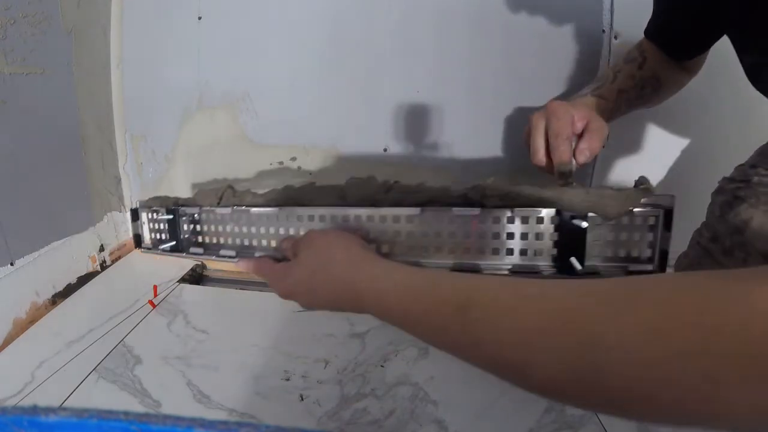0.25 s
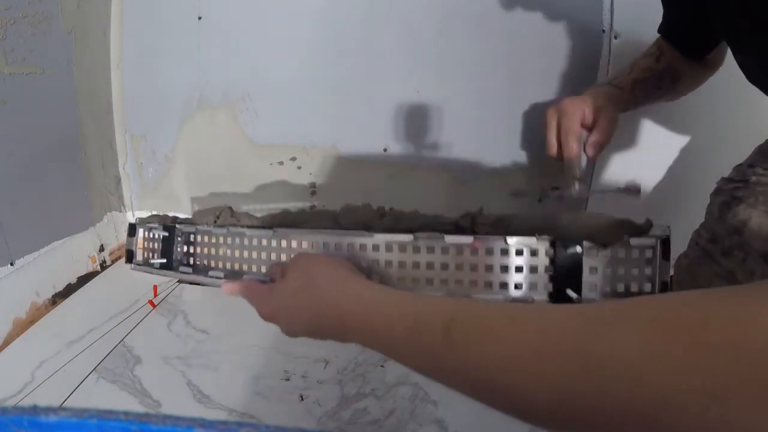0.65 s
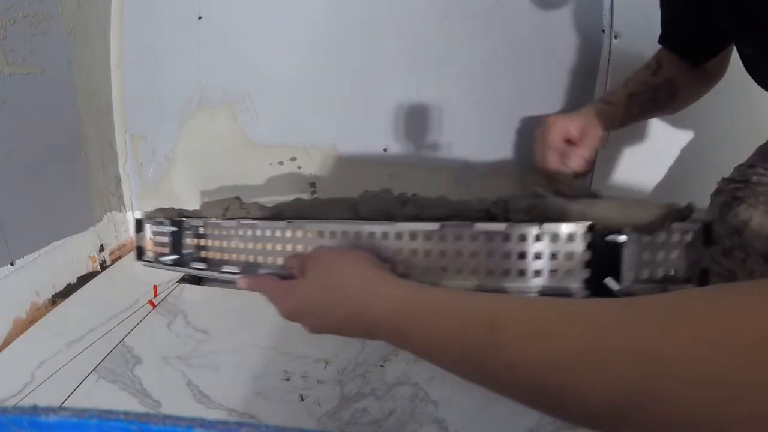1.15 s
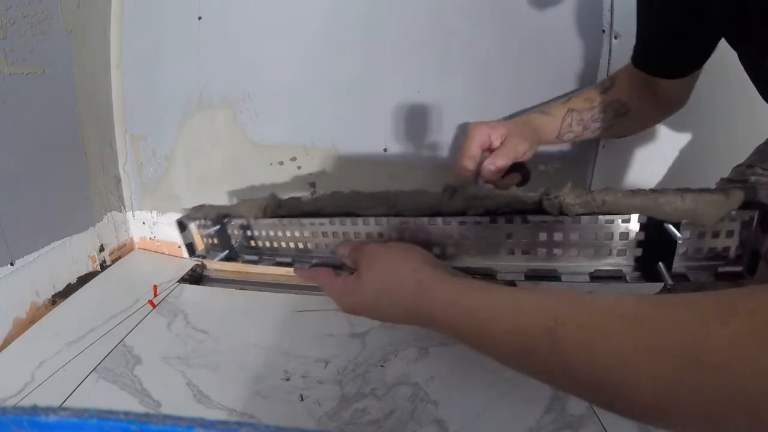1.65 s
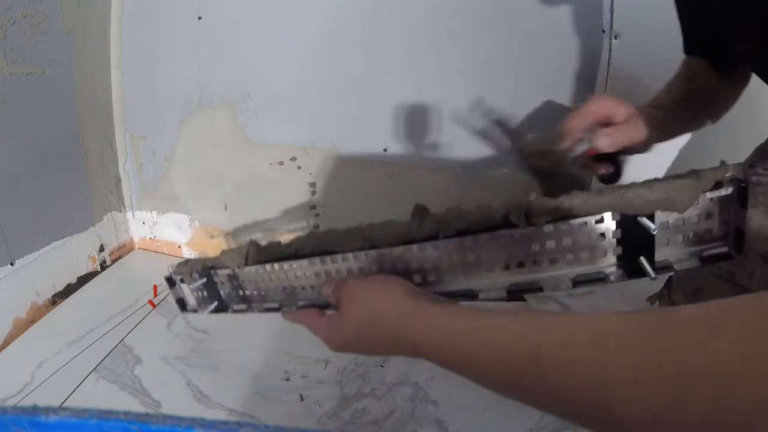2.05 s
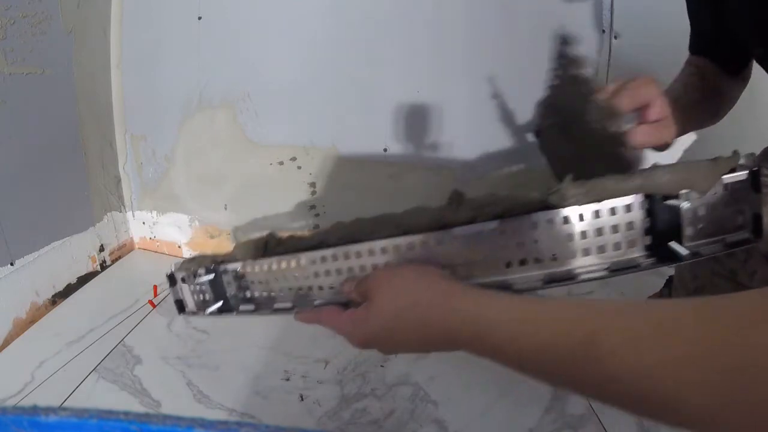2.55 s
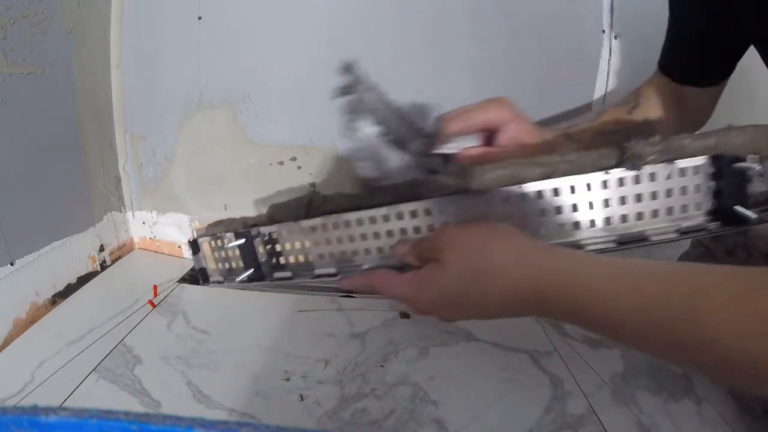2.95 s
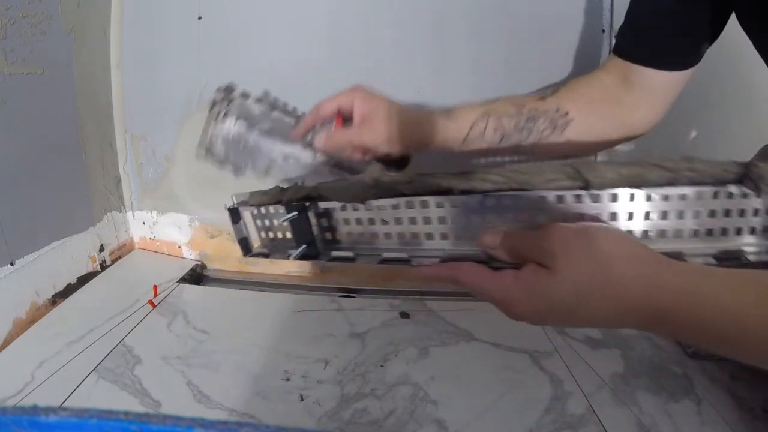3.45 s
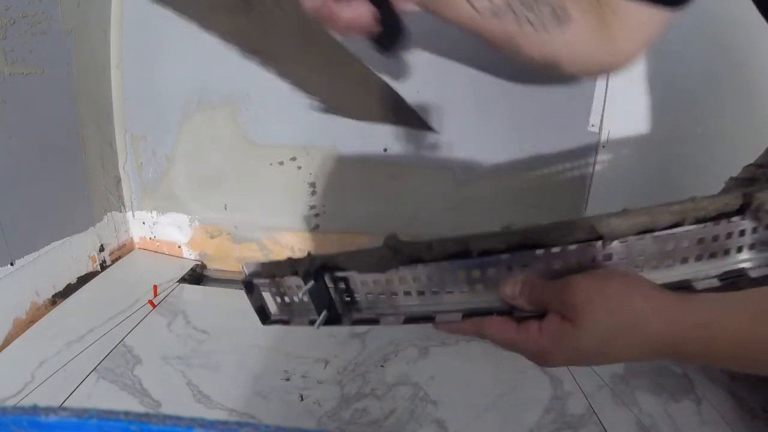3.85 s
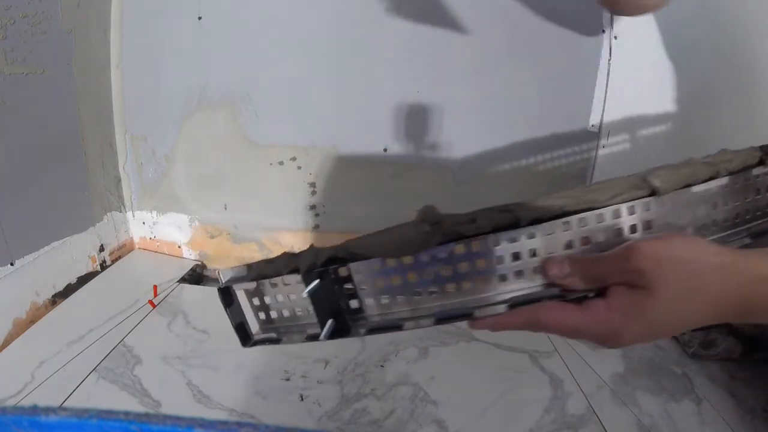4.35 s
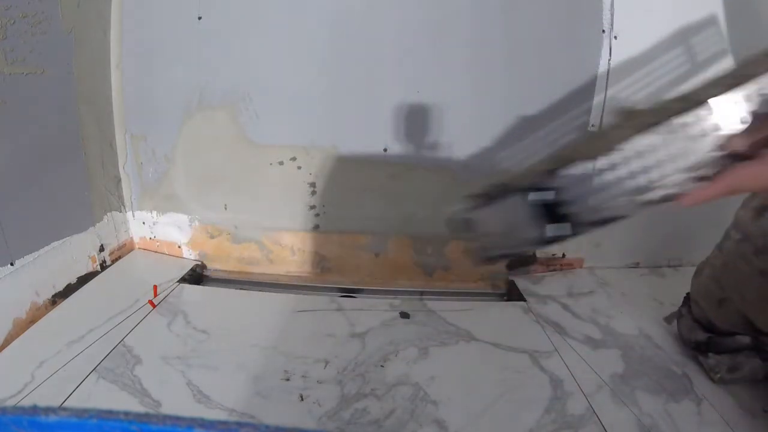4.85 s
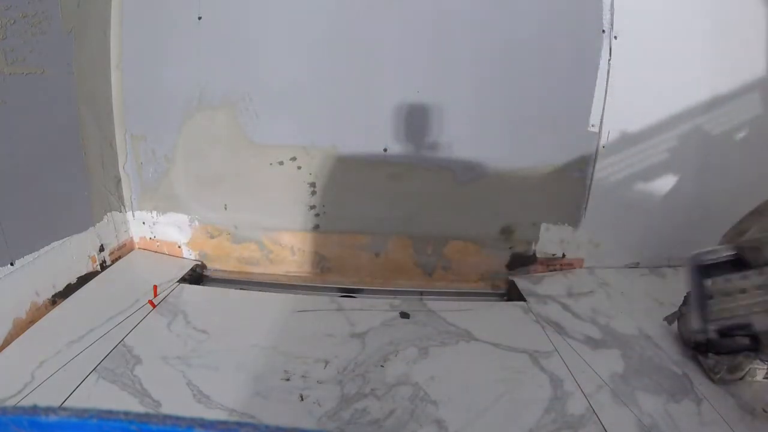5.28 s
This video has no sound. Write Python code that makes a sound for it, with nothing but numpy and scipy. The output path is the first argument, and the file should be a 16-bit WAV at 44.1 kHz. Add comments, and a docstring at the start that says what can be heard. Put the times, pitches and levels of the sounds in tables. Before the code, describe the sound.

A steel trowel makes short gritty wipes and squeaks on a metal channel, then knocks and scrapes at length before light ticks and a floor thud.

```python
"""Bare tiled bathroom: a steel trowel wipes mortar onto a long metal drain channel, knocks, then scrapes at length.
Trowel: random grit clicks and short rattles ring steel modes; gliding tones squeak, mode pairs sing on.
Channel ticks, rustling clothes and a sliding shoe are coloured clicks; landings ring low floor modes.
Decaying noise makes the small room's reverberation; filtered noise and sines make rumble, hiss and hum."""
import sys
import numpy as np
from scipy import signal
from scipy.fft import rfft, irfft, next_fast_len
from scipy.io import wavfile
from scipy.ndimage import uniform_filter1d

SR = 44100
rng = np.random.default_rng(int(sys.argv[2]) if len(sys.argv) > 2 else 0)


def put_to_file(sound):
    """Save the sound as 16-bit audio at rate SR, in the file named by the first command-line argument."""
    columns = np.atleast_2d(sound).T  # one column per channel
    safe = np.clip(columns, -1, 1)
    whole_steps = np.round(safe * 32767)
    wavfile.write(sys.argv[1], SR, whole_steps.astype(np.int16))


N = 243431
TIME_S = np.arange(N) / SR

# Source levels are relative: each source has its own mix gain.
# air noise spectrum: (frequency [Hz], level [dB])
AIR_SPECTRUM = [(12, -47), (22, -3), (45, -11.5), (70, -5.5), (100, -3), (155, -21), (200, -16),
                (260, -21.5), (480, -22.5), (1000, -28), (2500, -32.5), (4900, -44), (6800, -31.5),
                (14000, -46.5)]
# steady hum lines: (frequency [Hz], rms level [dB])
HUM_LINES = [(59.5, -59), (721, -74)]
# room decay: (frequency [Hz], t60 [s])
ROOM_DECAY = [(80, 0.53), (250, 0.67), (1400, 0.54), (4000, 0.57), (7000, 0.67), (13000, 0.38)]
# microphone port resonance: (frequency [Hz], width [Hz], level [dB])
PORT_MODES = [(6400, 265, 6.5)]
# corner round the worker, resonances: (frequency [Hz], width [Hz], level [dB])
CORNER_MODES = [(358, 34, -3.5)]

# soft blows on the floor: (time [s], level [dB], push length [s], grit re level [dB])
FLOOR_BLOWS = [(1.59, -40.5, 0.0036, -15), (5.132, -30, 0.012, 0), (5.173, -19, 0.0021, -7)]
# floor modes: (frequency [Hz], t60 [s], level [dB])
FLOOR_MODES = [(82.6, 0.21, -5), (124, 0.13, -1.5), (212, 0.15, -5.5), (274, 0.17, -19), (375, .25, -2.5),
               (399, 0.15, -1.5), (630, 0.18, -21)]
# floor shudder spectrum: (frequency [Hz], level [dB])
FLOOR_SPECTRUM = [(25, -23), (80, 2.5), (180, -5.5), (290, -15), (400, -20.5), (650, -16), (1200, -26.5),
                  (3000, -60)]
# sole on dust spectrum: (frequency [Hz], level [dB])
SOLE_SPECTRUM = [(100, -6.5), (280, 0), (370, 1.5), (700, -2), (1150, -8), (1700, 1), (2700, 0.5),
                 (3700, 3), (5000, -5), (7000, -8), (9800, -20.5), (11500, -19.5), (13000, -57)]
# shoe slides: (time [s], length [s], level at top speed [dB],
# treble lift and bass cut about 2.5 kHz at top speed [dB])
SHOE_SLIDES = [(4.486, 0.24, -32.5, 2), (4.836, 0.16, -39.5, 0), (4.974, 0.17, -49, 0.5),
               (5.12, 0.13, -38.5, 0)]
# cloth spectrum: (frequency [Hz], level [dB])
CLOTH_SPECTRUM = [(60, -14.5), (200, -2.5), (400, -1), (700, -7.5), (1200, -6), (2600, -12), (3900, -8.5),
                  (5200, -18.5), (9000, -19), (14000, -67)]
# clothes as arm and body move: (time [s], length [s], level at top speed [dB])
CLOTH_MOVES = [(3.738, 0.15, -56), (3.796, 0.9, -56.5), (4.728, 0.072, -48), (4.987, 0.44, -49)]

# light ticks of the channel in the hand: (time [s], level [dB])
HAND_TICKS = [(4.1588, -27.5), (4.2256, -40), (4.3117, -32.5), (4.351, -38), (4.4794, -25.5)]
# tick spectrum: (frequency [Hz], level [dB])
TICK_SPECTRUM = [(400, -17), (1400, -12), (2100, 2), (4000, 3.5), (7000, -14), (10000, -21), (14000, -36)]

# blade rings on as it lifts, pitch set by the mortar it carries: (time [s], lower mode [Hz], its level [dB])
BLADE_LIFTS = [(1.12, 1150, -50), (1.735, 1367, -45), (3.41, 1238, -44)]
# gliding squeaks of juddering steel: (time [s], start [Hz], end [Hz], level [dB])
STEEL_SQUEAKS = [(0.35, 3000, 3180, -40), (.438, 1920, 1730, -33), (.459, 1840, 1680, -30.5),
                 (1.059, 3260, 3160, -42), (1.078, 1320, 1436, -27.5), (1.672, 2610, 1900, -28),
                 (1.675, 1177, 1130, -30.5), (1.692, 1168, 1480, -26), (1.722, 6360, 6330, -38)]
# sharp knocks of blade on channel: (time [s], level [dB], body hump near 400 Hz [dB])
BLADE_KNOCKS = [(.396, -29, 8), (.438, -25, 2), (1.668, -23.5, 5), (2.460, -11.5, 10), (2.671, -17, -14),
                (2.946, -13.5, 0), (3.119, -14, -7), (3.187, -16, -9), (3.383, -17, -11)]
# blade catching on coarse sand: (time [s], level [dB], treble tilt [dB/octave])
SAND_CATCHES = [(.089, -37, -2), (.323, -38, -3.5), (.461, -27.5, 1), (.498, -23, 4), (.534, -23.5, 3.5),
                (.567, -21, 4), (.590, -23, 1.5), (1.061, -29, 2.5), (1.089, -30.5, 6.5),
                (1.118, -26.5, 0.5), (1.675, -23, 3), (1.69, -20.5, 2.5), (1.728, -19, 2.5),
                (2.535, -22, 0), (2.564, -24, 0.5), (2.762, -26.5, -5), (2.778, -24.5, -1),
                (2.982, -21.5, -4), (3.072, -18, -2), (3.144, -22.5, -4.5), (3.225, -20, -2.5),
                (3.253, -27, 0)]
# short wipes of the loaded blade: (time [s], length [s], level [dB], change over wipe [dB],
# treble lift and bass cut about 2.5 kHz [dB], body of catches near 400 Hz [dB], contact ring [Hz])
BLADE_WIPES = [(0, .11, -45.5, -6, 1, 4, 1450), (0.348, 0.042, -37, 3, -1, -2, 1440),
               (.404, .195, -33.5, -7, -2.5, 7, 1394), (1.066, 0.064, -40, -5, -8, 7, 1180),
               (1.668, .066, -29.5, 3.5, -2, 14.5, 1120)]
# long scrape along the channel: (time [s], level [dB], contact ring [Hz])
LONG_SCRAPE = [(2.485, -36.5, 1300), (2.62, -34.5, 1390), (2.69, -27, 1620), (2.86, -33, 1180),
               (3.0, -39, 1060), (3.08, -32, 1110), (3.2, -41.5, 1090), (3.33, -32.5, 1170),
               (3.405, -36, 1600)]
# broad spectrum of blade on channel: (frequency [Hz], level [dB])
STEEL_SPECTRUM = [(100, -25), (270, -13.5), (350, -8.5), (560, -3), (800, 0), (1250, 0.5), (1800, -2),
                  (2700, -4.5), (3500, -0.5), (5000, -8), (7000, -12), (9500, -24), (11500, -21.5),
                  (14000, -46)]
# modes of blade on channel: (frequency [Hz], width [Hz], level over broad response [dB])
STEEL_MODES = [(331, 23, -1), (664, 31, -8.5), (1177, 37, 2.5), (1371, 44, 2.5), (1600, 93, -3.5),
               (1980, 81, -3), (2254, 83, -4.5), (3350, 260, -8.5), (3830, 93, -3)]

AIR_LEVEL_DB, TOP_HZ = -56.0, 14300
SLIDE_SWELL_DB, SLIDE_BRIGHTEN_DB = 12.5, 1  # rest to top speed
RUSTLE_SWELL_DB = 9
SQUEAK_S = 0.0107
KNOCK_RISE_S, KNOCK_T60_S, KNOCK_TILT_DB_PER_OCT = 0.00053, 0.027, 0.23
CATCH_RISE_S, CATCH_T60_S = 0.0015, 0.047
SNAGS_PER_S, SNAG_DB, SNAG_SPREAD_DB = 20, 2.5, 2  # level over the rubbing, +/- spread
# body near 400 Hz is low: the bare blade hardly shakes the channel
SCRAPE_TILT_DB, SCRAPE_BODY_DB = 1.0, -9.5


def undb(db):
    """Decibels to gain."""
    return 10 ** (np.asarray(db) / 20)


def unit(x):
    """Scale to rms 1."""
    return x / np.sqrt(np.mean(x ** 2))


def decay(t_s, t60_s):
    """Exponential decay: 60 dB down after t60."""
    return np.exp(-np.log(1000) * t_s / t60_s)


def filtered(x, response):
    """Apply a frequency response, zero-padded to leave room for its ring."""
    size = next_fast_len(2 * len(x), True)
    hz = np.maximum(np.arange(size // 2 + 1) * SR / size, 1)
    return irfft(rfft(x, size) * response(hz), size)[:len(x)]


def on_log(hz, points):
    """Interpolate (Hz, value) points on a log-frequency axis."""
    point_hz, value = np.transpose(points)
    return np.interp(np.log(hz), np.log(point_hz), value)


def colour(x, points, tilt_db=0, ring_hz=1000, ring_db=0, octaves=0.16, size=8192):
    """Causal filter: spectrum, tilt per octave and one broad hump."""
    hz = np.maximum(np.arange(size // 2 + 1) * SR / size, 1)
    db = on_log(hz, points) + tilt_db * np.log2(np.maximum(hz, 300) / 2000)
    db = db + ring_db * np.exp(-(np.log2(hz / ring_hz) / octaves) ** 2)
    # folded cepstrum gives minimum phase
    cepstrum = irfft(np.log(undb(db)))
    cepstrum[1:size // 2] *= 2
    cepstrum[size // 2 + 1:] = 0
    impulse = irfft(np.exp(rfft(cepstrum)))
    return signal.fftconvolve(x, impulse)[:len(x)]


def resonate(x, modes):
    """Add the ring of (Hz, width, dB) modes to the direct sound."""
    def response(f):
        return 1 + sum(undb(db) / (1 + 1j * (f * f - hz * hz) / (f * width_hz))
                       for hz, width_hz, db in modes)
    return filtered(x, response)


def moving_ring(x, hz, width_hz):
    """One resonance whose centre follows a curve: shift to 0 Hz, low-pass, shift back."""
    turn = np.exp(2j * np.pi * np.cumsum(hz) / SR)
    pole = np.exp(-np.pi * width_hz / SR)
    return 2 * np.real(turn * signal.lfilter([1 - pole], [1, -pole], x / turn))


def walk(rate_hz):
    """Smooth random curve, spread near 1."""
    k = int(SR / rate_hz)
    steps = np.repeat(rng.standard_normal(N // k + 1), k)
    return 1.63 * uniform_filter1d(steps, k)[:N]


def grit(rate_hz, spread_db):
    """Sand grains breaking loose: random clicks, a few much larger than the rest."""
    size = undb(spread_db * np.minimum(rng.exponential(size=N), 3.4))
    clicks = rng.random(N) < rate_hz / SR
    return unit(clicks * size * rng.choice([-1, 1], N))


def chatter(t60_s, rise_s, count=16384):
    """Contact force: a dying rattle of tiny impacts, led by a click if the touch is abrupt."""
    t_s = np.arange(count) / SR
    rattle = rng.choice([-1, 1], count) * (1 - np.exp(-t_s / rise_s)) * decay(t_s, max(t60_s, .002))
    rattle[0] += 7 * np.exp(-rise_s / 0.00059)
    return rattle


def add(out, time_s, x, level_db, crest=2.19, size=128):
    """Mix a blow in, scaled by its loudest few milliseconds."""
    i = int(max(time_s, 0) * SR)
    loudest_rms = np.sqrt(uniform_filter1d(x * x, size).max())
    x = x * undb(level_db) / (crest * loudest_rms)
    out[i:i + len(x)] += x[:N - i]


def rub(x, gain, tilt_db, pivot_hz=2500):
    """Friction noise at a gain, treble lifted and bass cut about a pivot."""
    low = filtered(x, lambda f: 1 / (1 + (f / pivot_hz) ** 2))
    bright = undb(tilt_db)
    return (low / bright + (x - low) * bright) * gain


def progress(start_s, length_s):
    """Fraction of a movement completed, 0 to 1."""
    return np.clip((TIME_S - start_s) / length_s, 0, 1)


def speed(start_s, length_s):
    """A limb speeds up and slows down: half a sine, 0 to 1."""
    return np.sin(np.pi * progress(start_s, length_s))


def touching(start_s, end_s, edge_s):
    """1 while two surfaces touch, with a linear fade on either side."""
    return np.clip(np.minimum(TIME_S - start_s, end_s - TIME_S) / edge_s + 1, 0, 1)


def background():
    """Low building rumble and hiss from noise; hum from sines with wandering phase."""
    level_db = AIR_LEVEL_DB + 1.3 * walk(2.75)
    out = unit(colour(rng.standard_normal(N), AIR_SPECTRUM)) * undb(level_db)
    for hz, rms_db in HUM_LINES:
        phase = 2 * np.pi * hz * TIME_S + 0.23 * walk(3.55)
        out += np.sqrt(2) * undb(rms_db) * np.sin(phase)
    return out


def room(x, wet_db, count=32768):
    """A dense noise tail builds within milliseconds, then dies away band by band."""
    t_s = np.arange(count) / SR
    noise, tail = rng.standard_normal(count), 0
    for octave in range(4, 16):  # log2 of centre Hz
        band = filtered(noise, lambda f: np.maximum(1 - np.abs(np.log2(f) - octave), 0))
        tail = tail + band * decay(t_s, on_log(2. ** octave, ROOM_DECAY))
    tail = tail * (1 - np.exp(-t_s / 0.0012))
    tail = tail / np.sqrt(np.sum(tail ** 2))
    return x + undb(wet_db) * signal.fftconvolve(x, tail)[:N]


def clothes():
    """Soft, uneven rubbing of fabric that swells with each movement."""
    folds = undb(1.6 * walk(35))
    fabric = unit(colour(grit(rate_hz=14000, spread_db=1.8), CLOTH_SPECTRUM))
    motion = 0
    for start_s, length_s, db in CLOTH_MOVES:
        swell_db = RUSTLE_SWELL_DB * (1 - speed(start_s, length_s))
        motion = motion + undb(db - swell_db) * touching(start_s, start_s + length_s, edge_s=0.062)
    return undb(-4.5) * fabric * folds * motion


def shoe_slide():
    """Fine dust hisses under a dragged sole, louder and brighter with speed."""
    dust, out = unit(colour(grit(rate_hz=12000, spread_db=3.0), SOLE_SPECTRUM)), 0
    for start_s, length_s, db, tilt_db in SHOE_SLIDES:
        slack = 1 - speed(start_s, length_s)
        contact = touching(start_s, start_s + length_s, edge_s=.008)
        gain = undb(db - SLIDE_SWELL_DB * slack) * contact
        out = out + rub(dust, gain, tilt_db - SLIDE_BRIGHTEN_DB * slack)
    return undb(-1.5) * out


def thuds(count=16384):
    """Weight lands: a short push rings low floor modes, the sole shudders, grit crunches on top."""
    out, t_s = np.zeros(N), np.arange(count) / SR
    ring = sum(undb(db) * np.sin(2 * np.pi * hz * t_s) * decay(t_s, t60_s)
               for hz, t60_s, db in FLOOR_MODES)
    for time_s, db, push_s, grit_db in FLOOR_BLOWS:
        force = np.sin(np.pi * np.minimum(t_s / push_s, 1))
        add(out, time_s, signal.fftconvolve(force, ring)[:count], db + 1.0, crest=1.7)
        shudder = colour(chatter(t60_s=0.29, rise_s=.002), FLOOR_SPECTRUM)
        add(out, time_s, shudder, db - 8.5, crest=1.01)
        crunch = colour(chatter(t60_s=0.026, rise_s=.001), SOLE_SPECTRUM,
                        tilt_db=-1.5, ring_hz=2200, ring_db=7, octaves=0.18)
        add(out, time_s, crunch, db + grit_db)
    return out


def channel_ticks():
    """Thin, dry clicks of the channel shifting in the grip."""
    out = np.zeros(N)
    for time_s, db in HAND_TICKS:
        add(out, time_s, colour(chatter(t60_s=0.021, rise_s=0.00019), TICK_SPECTRUM), db)
    return undb(-5.0) * out


def blade_ring(t60_s=0.53):
    """The freed blade sings briefly; a close pair of modes makes it waver."""
    out = np.zeros(N)
    for time_s, hz, db in BLADE_LIFTS:
        age_s = np.maximum(TIME_S - time_s, 0)
        pair = np.sin(2 * np.pi * hz * age_s) + undb(-4.5) * np.sin(2 * np.pi * (hz + 28) * age_s)
        out += undb(db) * pair * decay(age_s, t60_s)
    return out


def trowel_squeaks(rough=0.036):
    """Slips lock into a gliding tone for some milliseconds; louder squeaks are rougher in pitch."""
    out, count = np.zeros(N), int(SQUEAK_S * SR)
    for time_s, start_hz, end_hz, db in STEEL_SQUEAKS:
        jitter = rough * undb((db + 30) / 2) * walk(910)[:count]
        hz = np.geomspace(start_hz, end_hz, count) * (1 + jitter)
        tone = np.sin(2 * np.pi * np.cumsum(hz) / SR)
        add(out, time_s, tone * signal.windows.tukey(count, .7), db, crest=1.0)
    return undb(-3.5) * out


def steel_blow(t60_s, rise_s, tilt_db, body_db):
    """One contact rings the steel modes; a broad hump sets the channel's body."""
    force = chatter(t60_s, max(rise_s, .0001))
    blow = colour(force, STEEL_SPECTRUM, tilt_db, ring_hz=365, ring_db=body_db, octaves=0.66)
    return resonate(blow, STEEL_MODES)


def trowel_knocks():
    """The blade strikes sharply or catches gradually; catch body is interpolated between strokes."""
    out = np.zeros(N)
    for time_s, db, body_db in BLADE_KNOCKS:
        add(out, time_s, steel_blow(KNOCK_T60_S, KNOCK_RISE_S, KNOCK_TILT_DB_PER_OCT, body_db), db)
    bodies = [(s + length_s / 2, body_db) for s, length_s, *_, body_db, _ in BLADE_WIPES]
    bodies.append((LONG_SCRAPE[0][0], SCRAPE_BODY_DB))
    for time_s, db, tilt_db in SAND_CATCHES:
        body_db = np.interp(time_s, *np.transpose(bodies))
        add(out, time_s, steel_blow(CATCH_T60_S, CATCH_RISE_S, tilt_db, body_db), db)
    return undb(-2.0) * out


def strokes(edge_s=0.0099):
    """Pressure (as gain) and tilt: wipes bear down or ease off evenly, the scrape swells and sinks."""
    out = []
    for start_s, length_s, db, change_db, tilt_db, *_ in BLADE_WIPES:
        level_db = db + change_db * (progress(start_s, length_s) - .5)
        out.append((undb(level_db) * touching(start_s, start_s + length_s, edge_s), tilt_db))
    time_s, db, _ = np.transpose(LONG_SCRAPE)
    scrape = undb(np.interp(TIME_S, time_s, db)) * touching(time_s[0], time_s[-1], edge_s)
    return out + [(scrape, SCRAPE_TILT_DB)]


def trowel_snags():
    """Lesser grains snag the moving blade at uneven intervals, as hard as it is pressed."""
    out, pressure = np.zeros(N), sum(gain for gain, _ in strokes())
    draws = rng.random((int(N / SR * SNAGS_PER_S), 2))
    for slot, (late, luck) in enumerate(draws):
        time_s = (slot + late) / SNAGS_PER_S
        gain = np.interp(time_s, TIME_S, pressure)
        if gain > 0:
            db = 20 * np.log10(gain) + SNAG_DB + SNAG_SPREAD_DB * (2 * luck - 1)
            add(out, time_s, steel_blow(t60_s=0.046, rise_s=.0018, tilt_db=1.7, body_db=5.5), db)
    return out


def shifting(x, depth_db, rate_hz):
    """Each slip grips somewhere else: half-octave bands flare and fade on their own."""
    out = 0
    for centre in np.arange(7, 14.6, .5):  # log2 of Hz
        band = filtered(x, lambda f: np.maximum(1 - 2 * np.abs(np.log2(f) - centre), 0))
        out = out + band * undb(depth_db * walk(rate_hz * rng.uniform(.7, 1.3)))
    return out


def trowel_scrape():
    """Sand rolls between blade and channel, sticking and slipping, and rings the steel."""
    force = grit(rate_hz=2600, spread_db=2.5) * undb(2.4 * walk(130))
    force = shifting(force, depth_db=2.6, rate_hz=55)
    steel = unit(resonate(colour(force, STEEL_SPECTRUM), STEEL_MODES))
    return undb(-9.5) * sum(rub(steel, pressure, tilt_db) for pressure, tilt_db in strokes())


def contact_ring(x, ring_db=0.0):
    """Contact favours one narrow part of the ring; it glides between wipes and all along the long scrape."""
    path = [(s + length_s / 2, hz) for s, length_s, *_, hz in BLADE_WIPES]
    path += [(s, hz) for s, _, hz in LONG_SCRAPE]
    hz = np.interp(TIME_S, *np.transpose(path))
    return x + undb(ring_db) * moving_ring(x, hz, width_hz=143)


def scene():
    """Trowel, channel and worker share the small hard room."""
    floor = room(thuds(), wet_db=-8.5)
    worker = room(resonate(shoe_slide() + clothes(), CORNER_MODES), wet_db=-7.5)
    ticks = room(channel_ticks(), wet_db=-10)
    steel = contact_ring(trowel_scrape() + undb(-3.0) * trowel_knocks() + undb(-7.0) * trowel_snags())
    tools = room(steel + trowel_squeaks(), wet_db=-5.0)
    return (background() + floor + worker + ticks + blade_ring() + tools)[None]


def record(dry):
    """The microphone port adds a narrow treble peak; the top is cut."""
    sound = resonate(dry[0], PORT_MODES)[None]
    low_pass = signal.ellip(8, .2, 70, TOP_HZ, fs=SR, output="sos")
    return signal.sosfilt(low_pass, sound)


dry = scene()
out = record(dry)
put_to_file(out)
```